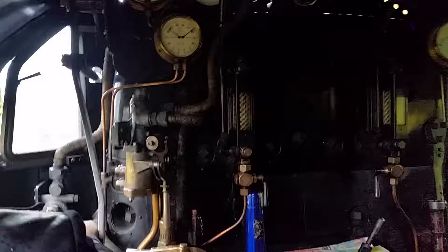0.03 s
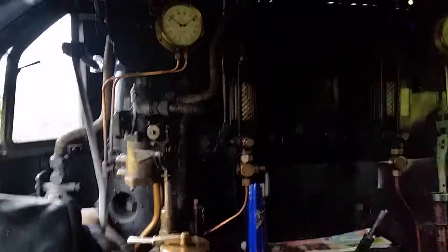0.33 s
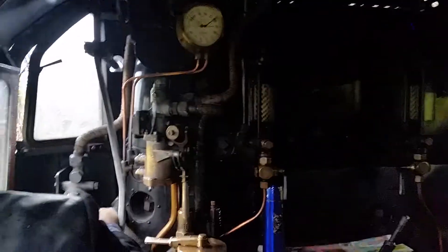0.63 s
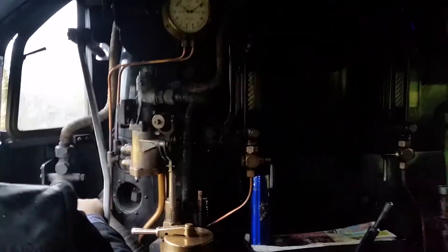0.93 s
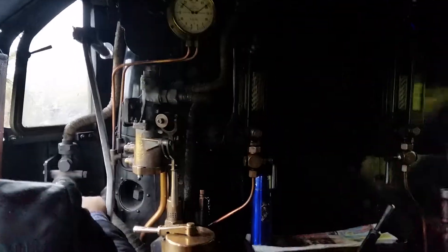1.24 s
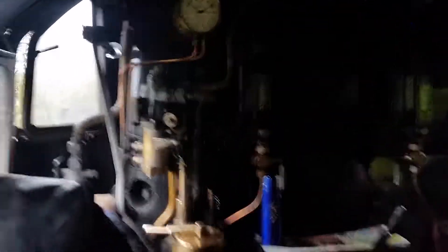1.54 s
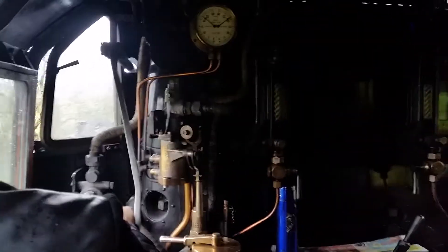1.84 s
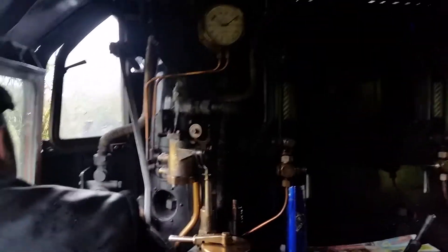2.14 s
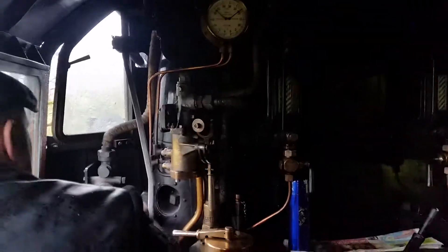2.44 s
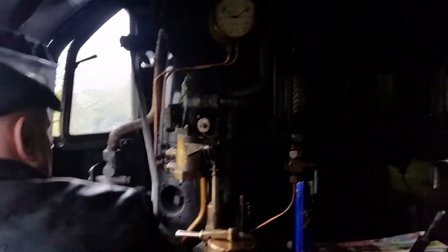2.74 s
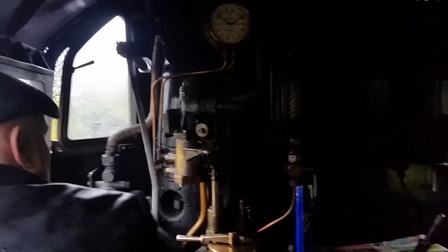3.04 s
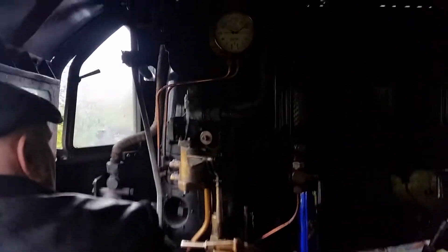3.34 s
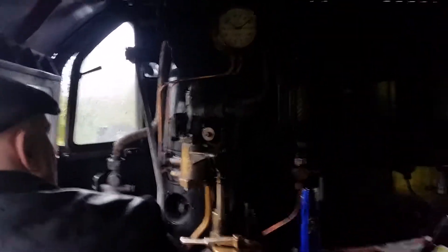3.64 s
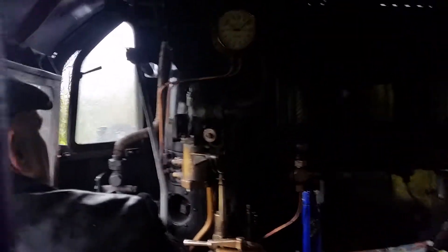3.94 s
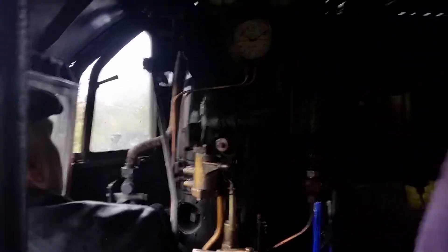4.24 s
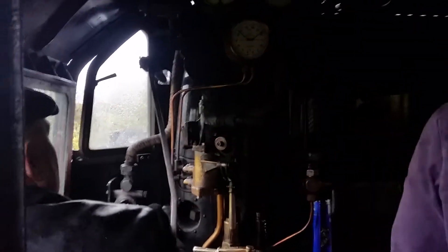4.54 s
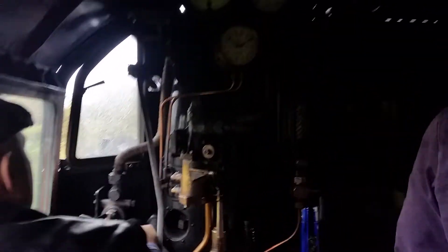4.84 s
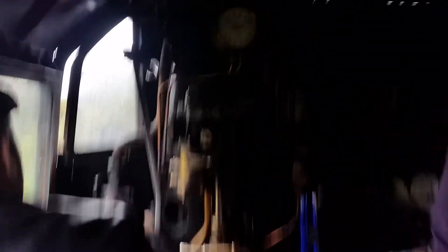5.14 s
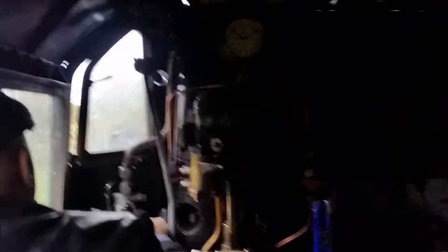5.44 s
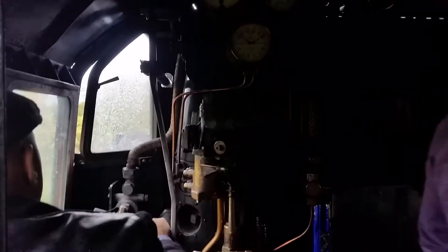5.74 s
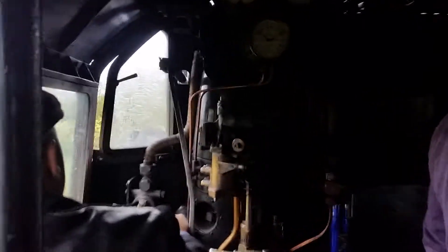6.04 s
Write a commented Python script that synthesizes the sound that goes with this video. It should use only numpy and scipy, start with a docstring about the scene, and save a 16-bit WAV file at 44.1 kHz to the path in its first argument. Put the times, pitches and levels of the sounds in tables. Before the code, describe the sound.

Rapid, booming exhaust chuffs and a deep rumble fill a running steam engine's cab, with hissing steam and occasional metal knocks.

```python
"""Booming, chuffing exhaust beats in the steel cab of a steam locomotive at speed, four to a wheel turn.
Each beat is a pressure pulse through the boiler and a rush of steam out of the chimney.
Wheels and frames rumble, a flange rasps, steam hisses, a gland spurts, air rushes past,
loose plates knock and small parts chink.
The sound fades in, and a limiter ducks the hiss under the heaviest booms."""
import sys
import numpy as np
from scipy import signal
from scipy.fft import rfft, irfft
from scipy.io import wavfile
from scipy.ndimage import uniform_filter1d, minimum_filter1d

SR = 44100
rng = np.random.default_rng(int(sys.argv[2]) if len(sys.argv) > 2 else 0)


def output_pcm(signal):
    """Save a mono or channel-first signal as 16-bit PCM at the path in sys.argv[1].

    Samples are clipped to [-1, 1] before scaling.
    """
    pcm = np.clip(np.atleast_2d(signal).T, -1, 1) * 32767
    wavfile.write(sys.argv[1], SR, np.round(pcm).astype(np.int16))


N = 268128
TIME_S = np.arange(N) / SR
FREQ_HZ = np.maximum(np.fft.rfftfreq(N, 1 / SR), 1)

# pressure pulse through boiler and firebox: freq_hz, density_db
BOOM_SPECTRUM = [(40, -88), (90, -43.5), (200, -39.5), (420, -64.5), (800, -81)]


def exhaust():
    """Each beat is a low boom and a slightly ragged rush of steam; both follow the engine's effort."""
    # rush out of the chimney: freq_hz, density_db
    chuff_spectrum = [(150, -59.5), (420, -60), (800, -58.5), (1600, -64), (2400, -65.5), (3600, -76.5),
                      (5800, -100), (8000, -102)]
    # exhaust strength: time_s, effort_db
    effort_curve = [(0.7, -0.2), (0.9, 0), (1.35, 1.2), (1.58, -2.5), (1.85, -0.1), (2.15, -1.5),
                    (3.35, 0.3), (4.25, -0.5), (4.62, -2.5), (5.02, 0.7), (5.45, -2), (5.78, 0.5),
                    (6.08, 0.7)]
    times_s, boom_db, chuff_db = exhaust_beats()
    scatter_db = 0.5 * rng.standard_normal(len(times_s))
    effort_db = np.interp(times_s, *np.transpose(effort_curve)) + scatter_db
    boom_envelope = puffs(times_s, boom_db + 0.89 * effort_db, rise_s=0.019, fall_s=0.049)
    chuff_envelope = puffs(times_s, chuff_db + 1.43 * effort_db, rise_s=0.028, fall_s=0.047)
    boom = turbulence(BOOM_SPECTRUM) * boom_envelope
    chuff = turbulence(chuff_spectrum) * chuff_envelope
    ragged = from_db(0.5 * drift(rate_hz=120))
    return from_db(1.9) * boom + from_db(2.5) * chuff * ragged


def heavy_beats():
    """Extra low boom on the heaviest exhaust beats."""
    # added booms: crest_s, level_db
    extra_booms = [(0.8, 2.5), (1.164, 0.5), (2.64, 3), (2.882, -3), (3.013, 0.5), (3.36, -3)]
    return turbulence(BOOM_SPECTRUM) * puffs(*np.transpose(extra_booms), rise_s=0.034, fall_s=0.032)


def exhaust_beats():
    """Four unevenly set beats a turn, about a quarter turn apart: times_s, boom_db, chuff_db."""
    # beats of one turn: late_s, boom_db, chuff_db
    valve_beats = [(-0.00083, 0.5, 0.1), (0.001, -1.9, -0.3), (-0.004, -0.3, -1.55), (0.0068, -0.5, 0.1)]
    rows = [(time_s + late_s, boom_db, chuff_db)
            for quarter, (late_s, boom_db, chuff_db) in enumerate(valve_beats)
            for time_s in wheel_times(quarter / 4)]
    return np.transpose(rows)


def wheel_times(phase_turns):
    """Times in s at which the driving wheels, slowly gaining speed, pass a point of their turn."""
    first_turn_s, start_turns_per_s, accel_turns_per_s2 = 0.4162, 1.9913, 0.0296
    turns = np.arange(12) + phase_turns
    turns_per_s = np.sqrt(start_turns_per_s ** 2 + 2 * accel_turns_per_s2 * turns)
    return first_turn_s + (turns_per_s - start_turns_per_s) / accel_turns_per_s2


def running_gear():
    """Wheels and frames rumble, shaken unevenly by the track."""
    # wheels, frames and fire: freq_hz, density_db
    rumble_spectrum = [(30, -45.5), (38, -41), (62, -43), (90, -39.5), (150, -41), (200, -40.5),
                       (420, -61.5), (800, -62.5), (1600, -75), (3600, -88)]
    return turbulence(rumble_spectrum) * from_db(drift(rate_hz=33) - 1.17)


def flange():
    """A wheel flange rasps as it grazes the rail."""
    # rail contacts: crest_s, level_db
    grazes = [(0.822, -12), (.93, -4), (1.045, 3), (4.95, -8), (5.05, -5)]
    # rasp: freq_hz, density_db
    rasp_spectrum = [(2000, -76), (2400, -64), (2680, -61), (2950, -74), (3300, -70)]
    return turbulence(rasp_spectrum) * puffs(*np.transpose(grazes), rise_s=0.078, fall_s=0.021)


def steam():
    """A sputtering leak surges after each beat, a gland spurts with the piston, valves whistle faintly."""
    # leak at the fittings: freq_hz, density_db
    hiss_spectrum = [(700, -75), (1600, -70.5), (2400, -69.5), (3600, -71.5), (6000, -73), (7700, -84),
                     (9600, -78), (13000, -86.5), (15500, -84)]
    # spells of leaking: time_s, strength
    leak_curve = [(0.75, 0.8), (1.3, 0.3), (1.6, -2), (2.6, 0.3), (2.8, 0.5), (3.35, 2.2), (3.72, 0.5),
                  (3.86, 0.5), (4.6, -0.7), (5.0, 0.6), (5.42, 0.2), (5.6, 1.4), (6.08, 3.0)]
    # gland blowing on the two piston strokes: phase_turns, level_db
    gland_strokes = [(0.105, -5), (0.665, 1)]
    # its bright spurt: freq_hz, density_db
    spurt_spectrum = [(3000, -80.5), (6000, -77.5), (7700, -86.5), (9600, -81.5), (13000, -87.5),
                      (15500, -85)]
    # steam in the valves: pitch_hz, level_db
    valve_tones = [(2618, -48.5), (5243, -55.5)]
    surge_times_s = exhaust_beats()[0] + 0.048
    surges = puffs(surge_times_s, np.zeros(len(surge_times_s)), rise_s=0.026, fall_s=0.03)
    hiss = turbulence(hiss_spectrum) * from_db(1.64 * surges - 3.0)
    strokes = [(time_s, level_db) for phase, level_db in gland_strokes for time_s in wheel_times(phase)]
    spurts = turbulence(spurt_spectrum) * puffs(*np.transpose(strokes), rise_s=0.028, fall_s=0.071)
    whistles = sum(from_db(level_db) * drift(rate_hz=7.2) * np.sin(2 * np.pi * pitch_hz * TIME_S)
                   for pitch_hz, level_db in valve_tones)
    sputter_db = 1.34 * over_time(leak_curve) + 1.04 * drift(rate_hz=17)
    return (hiss + spurts) * from_db(sputter_db) + whistles


def draught():
    """Air buffets the open cab side in gusts and throbs with the exhaust."""
    # rushing air: freq_hz, density_db
    rush_spectrum = [(500, -83), (1500, -66.5), (2200, -66), (2700, -68), (3200, -70.5), (4200, -103)]
    # gusts: time_s, strength
    gust_curve = [(0.7, 1.7), (1.3, 0.5), (1.62, 0.5), (2.65, 0.5), (3.45, 2), (3.9, -1), (4.6, 0.2),
                  (5.05, 1.2), (5.5, -1), (6.08, -4)]
    times_s = exhaust_beats()[0]
    rush = turbulence(rush_spectrum)
    throb_db = 2 * puffs(times_s, np.zeros(len(times_s)), rise_s=0.032, fall_s=0.034)
    gust_db = 2 * over_time(gust_curve) + 1.4 * drift(rate_hz=32)
    return rush * from_db(gust_db + throb_db - 4.5)


def loose_metal():
    """Loose plates knock, a small fitting pings and a link chinks, each ringing at its own modes."""
    # hits: start_s, level_db
    plate_hits = [(1.878, -26), (3.244, -16), (4.926, -12.5), (5.301, -22)]
    fitting_hits = [(4.512, -41)]
    link_hits = [(1.465, -43), (1.572, -43.5), (1.675, -42.5), (2.055, -45), (2.935, -44), (5.77, -44)]
    # modes: pitch_hz, level_db, t60_s
    plate_modes = [(482, -1, 0.081), (685, 0, 0.078), (760, 6, 0.022), (930, -4, 0.094), (1260, -1, 0.029),
                   (2200, -9, 0.021)]
    fitting_modes = [(11163, -1, .42), (14238, -7, .4)]
    link_modes = [(6580, 0, 0.16)]
    knocks = from_db(-12) * struck(plate_hits, plate_modes, scatter_db=3.5)
    ping = struck(fitting_hits, fitting_modes, scatter_db=1.0)
    chinks = struck(link_hits, link_modes, scatter_db=4.0)
    return knocks + ping + chinks


def cab(sound):
    """The steel box lifts its resonances and rings on at them."""
    # air and panel modes: centre_hz, width_hz, lift_db
    resonances = [(177.5, 14, 3.5), (207.6, 17.5, 7), (287, 18, 7), (310, 12, 1.5), (362.3, 38.4, 11.5),
                  (431, 7.9, 5), (477, 26, 8.5), (545, 22, 5.5), (657, 34, 6), (711, 11, 4), (761, 27, 4),
                  (922, 58, 4.5), (1034, 44, 3.5), (1121, 14, 5.5), (1268, 26, 5.5), (1418, 44, 4),
                  (1910, 20, 4), (2153, 42, 4.5), (3750, 28, 3)]
    response = 1
    for centre_hz, width_hz, lift_db in resonances:
        detuning = (FREQ_HZ ** 2 - centre_hz ** 2) / (FREQ_HZ * width_hz)
        response = response * (1 + (from_db(lift_db) - 1) / (1 + 1j * detuning))
    return irfft(rfft(sound) * response, N)


def turbulence(spectrum):
    """Stereo noise of a given density, falling steeply past its ends; the sides agree only in the bass."""
    # left-right likeness: freq_hz, correlation
    likeness = [(60, 1), (140, 1), (230, 0.95), (360, 0.96), (470, 0.71), (720, 0.78), (1050, 0.44),
                (1500, 0.1), (2000, -0.35), (2700, 0.42), (3600, -0.46), (4700, 0.48), (6000, -0.026)]
    skirts = np.minimum(FREQ_HZ / spectrum[0][0], 1) * np.minimum(spectrum[-1][0] / FREQ_HZ, 1)
    gain = from_db(over_freq(spectrum)) * skirts ** 4 * np.sqrt(SR / 4)
    correlation = np.clip(over_freq(likeness), -1, 1)
    mid, side = rfft(rng.standard_normal((2, N)))
    stereo = np.sqrt(1 + correlation) * mid + np.sqrt(1 - correlation) * side * [[1], [-1]]
    return irfft(gain * stereo, N)


def puffs(crests_s, levels_db, rise_s, fall_s):
    """Envelope of a run of puffs: each swells and dies away; their powers add."""
    power = np.zeros(N)
    for crest_s, gain in zip(crests_s, from_db(levels_db)):
        near = slice(*np.searchsorted(TIME_S, [crest_s - 0.2, crest_s + 0.2]))
        age_s = TIME_S[near] - crest_s
        width_s = np.where(age_s < 0, rise_s, fall_s)
        power[near] += gain ** 2 * np.exp(-(age_s / width_s) ** 2)
    return np.sqrt(power)


def struck(hits, modes, scatter_db):
    """Each hit sets every mode ringing with a strength of its own."""
    starts_s, levels_db = np.transpose(hits)
    offsets_db = scatter_db * rng.standard_normal((len(hits), len(modes)))
    ringing = np.zeros(N)
    for k, (pitch_hz, mode_db, t60_s) in enumerate(modes):
        clicks = np.full(N, 1e-18)
        clicks[(starts_s * SR).astype(int)] = from_db(levels_db + mode_db + offsets_db[:, k])
        radius = np.exp(-np.log(1000) / (t60_s * SR))
        step_rad = 2 * np.pi * pitch_hz / SR
        feedback = [1, -2 * radius * np.cos(step_rad), radius ** 2]
        ringing += (-1) ** k * signal.lfilter([0, np.sin(step_rad)], feedback, clicks)
    return ringing


def drift(rate_hz):
    """Slow random wander, zero mean and unit spread."""
    slow = irfft(rfft(rng.standard_normal(N)) / (1 + (FREQ_HZ / rate_hz) ** 2), N)
    return (slow - slow.mean()) / slow.std()


def from_db(level_db):
    """Decibels to gain."""
    return 10 ** (np.asarray(level_db) / 20)


def over_time(curve):
    """Rows of time_s, value at every sample."""
    return np.interp(TIME_S, *np.transpose(curve))


def over_freq(curve):
    """Rows of freq_hz, value at every frequency bin."""
    freq_hz, value = np.transpose(curve)
    return np.interp(np.log(FREQ_HZ), np.log(freq_hz), value)


def limiter(sound, ceiling_db, release_db_per_s):
    """The gain drops just ahead of each peak and climbs back steadily."""
    peak_db = 20 * np.log10(np.abs(sound).max(axis=0) + 1e-9)
    excess_db = np.maximum(peak_db - ceiling_db, 0)
    release_db = release_db_per_s * TIME_S
    cut_db = np.maximum.accumulate(excess_db + release_db) - release_db
    gain_db = uniform_filter1d(minimum_filter1d(-cut_db, size=177), size=177)  # 4 ms windows
    return sound * from_db(gain_db)


def scene():
    """All sources sound through the cab, coloured differently left and right."""
    # stereo balance: freq_hz, left_minus_right_db
    balance = [(100, -1.85), (350, -1.75), (700, -3.5), (1350, -2), (2000, -6), (3300, -7), (4700, -13),
               (5900, -20), (7800, -0.2), (8800, 10.2), (9900, 19), (11500, 5.5), (13500, 5), (15500, -5)]
    inside = cab(exhaust() + running_gear() + heavy_beats() + flange() + steam() + draught() + loose_metal())
    tilt = from_db(over_freq(balance))
    channel_gains = np.array([tilt, np.ones_like(tilt)]) * np.sqrt(2 / (1 + tilt ** 2))
    return irfft(rfft(inside) * channel_gains, N)


def record(dry):
    """Limiter, fade-in and a steep top cut."""
    fade_start_s, fade_end_s, cutoff_hz = 0.41, 0.71, 15800
    limited = limiter(dry * from_db(0.63), ceiling_db=-1.37, release_db_per_s=86)
    fade = np.clip((TIME_S - fade_start_s) / (fade_end_s - fade_start_s), 0, 1) ** 0.8
    top_cut = signal.ellip(12, 0.1, 80, cutoff_hz, fs=SR, output="sos")
    return signal.sosfilt(top_cut, limited * fade)


dry = scene()
out = record(dry)
output_pcm(out)
```